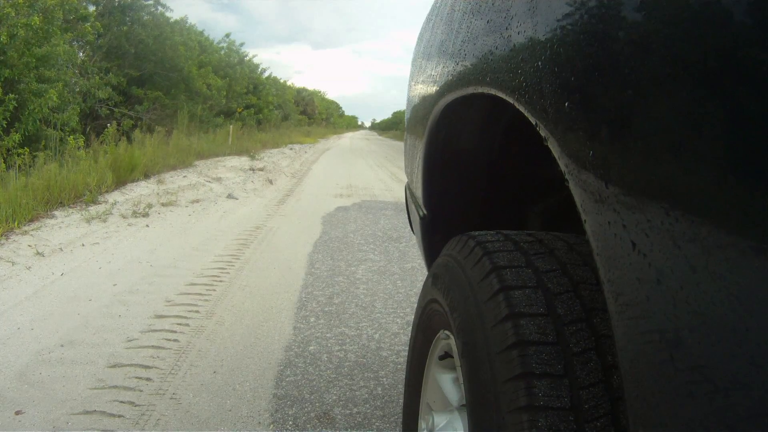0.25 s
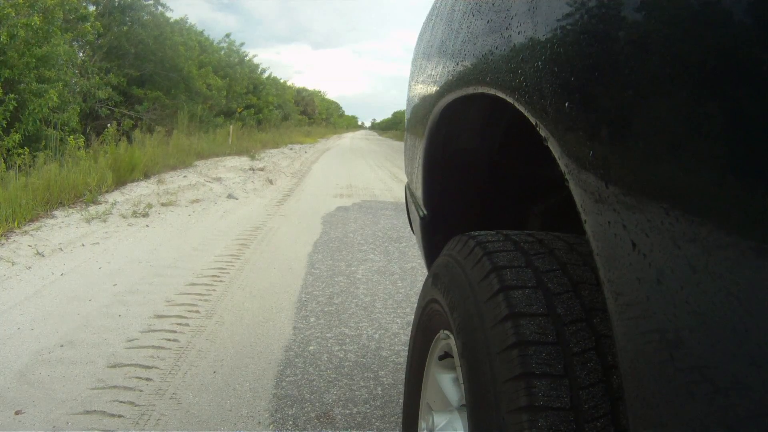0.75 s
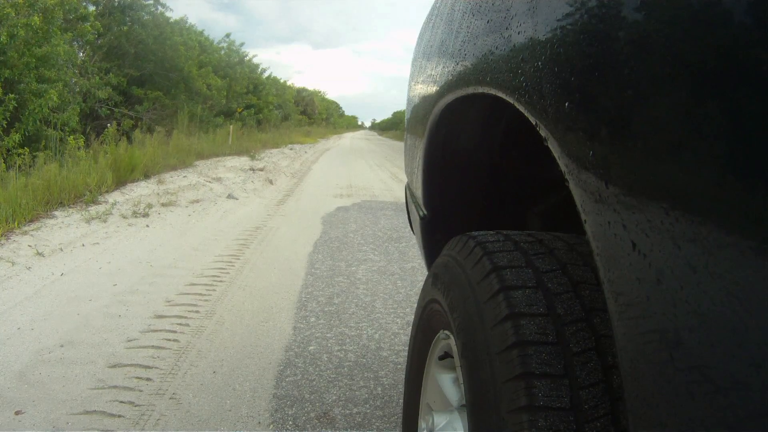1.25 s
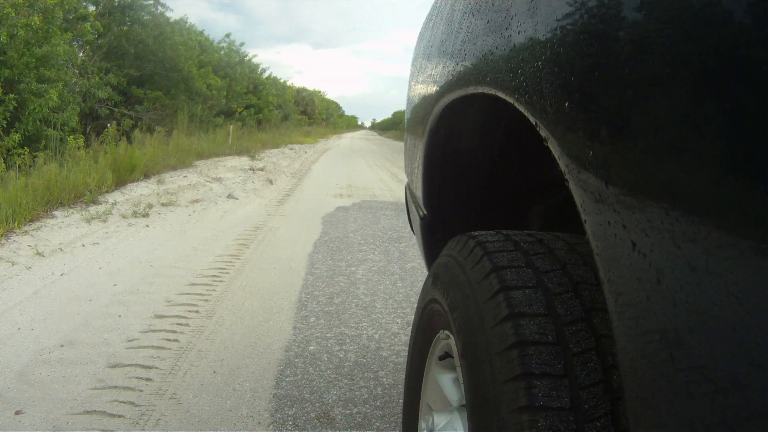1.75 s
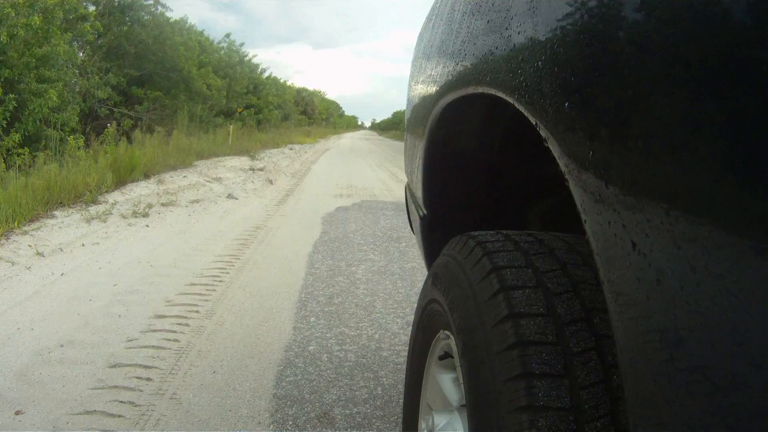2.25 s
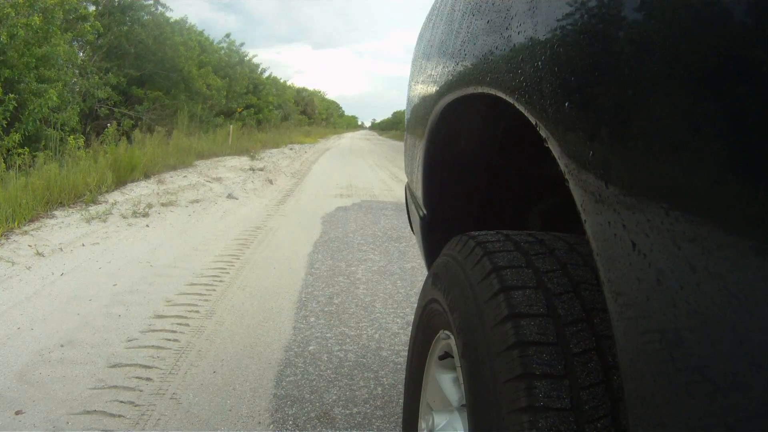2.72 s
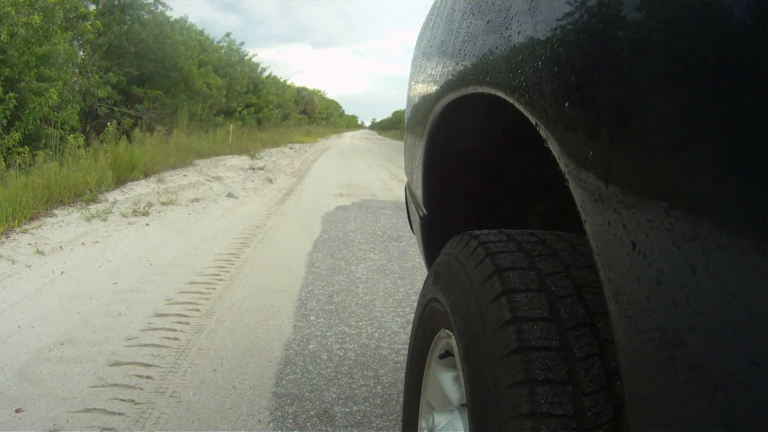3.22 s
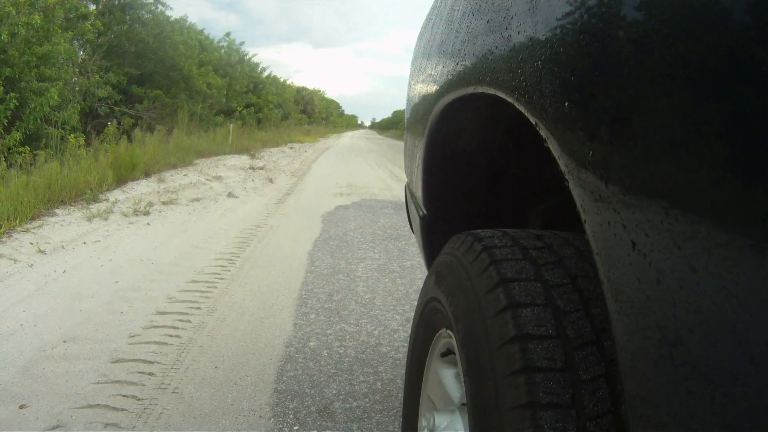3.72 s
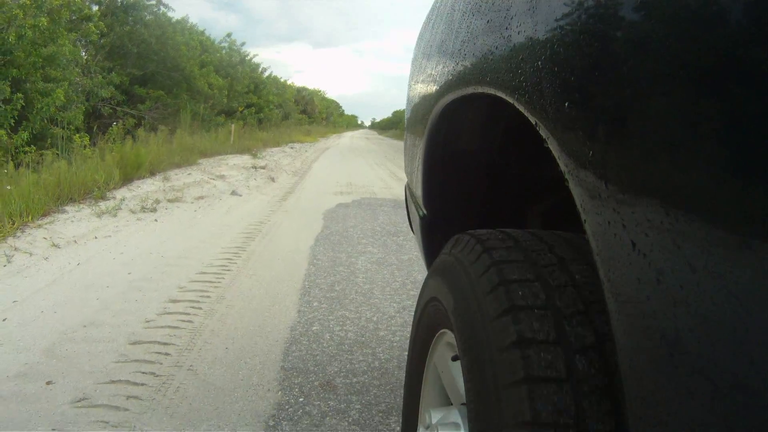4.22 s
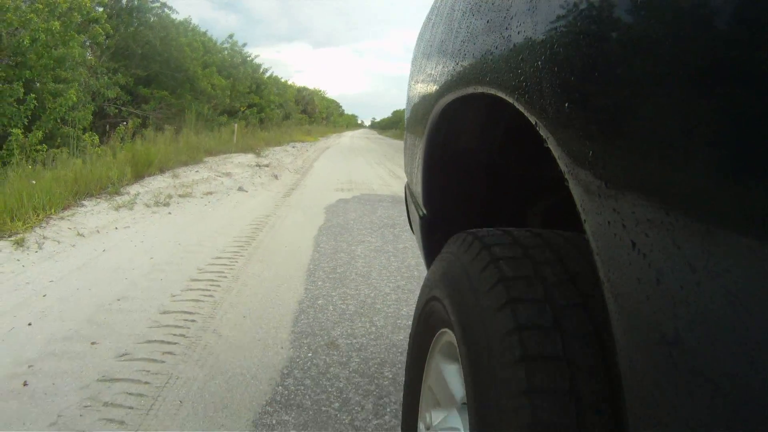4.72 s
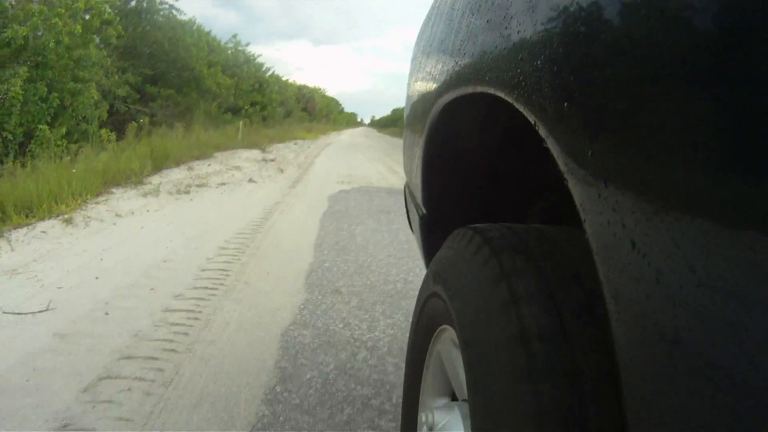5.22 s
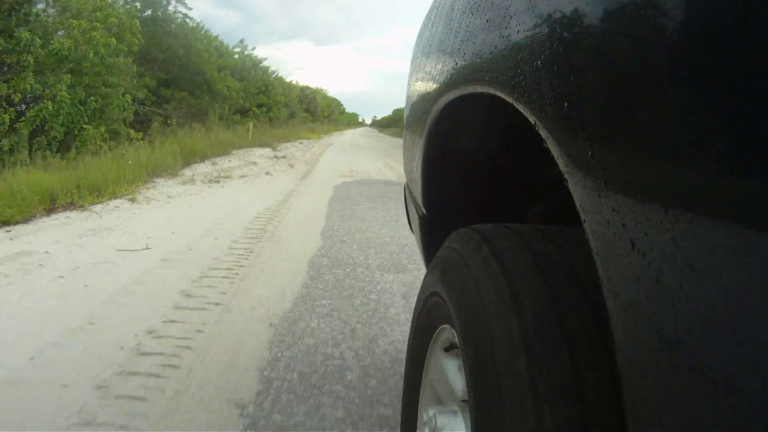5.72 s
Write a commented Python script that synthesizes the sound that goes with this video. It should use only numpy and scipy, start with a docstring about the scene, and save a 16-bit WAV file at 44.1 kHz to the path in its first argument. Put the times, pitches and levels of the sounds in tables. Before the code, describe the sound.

A six-cylinder diesel pickup with an open exhaust, heard close beside its front wheel outdoors. It idles low and lumpy with knock and hiss, shudders with small metal rattles as the drive engages, rolls away in a deeper rumble, then accelerates hard: a big low boom, louder clatter, a brief dip in the clatter and a rising roar.

```python
"""Behind the front wheel of a six-cylinder diesel pickup with an open exhaust, at a camera on its side.
It idles with a lope, shudders as the drive takes up, rolls off and revs hard; the clatter drops away
briefly while the pipe booms on. Exhaust orders (cosines locked to the engine cycle) fill the bass; noise
bursts at each firing, coloured by resonances of the panels and the camera's case, make knock and hiss."""
import sys
import numpy as np
from scipy import signal
from scipy.fft import rfft, irfft, next_fast_len
from scipy.io import wavfile

SR = 44100
rng = np.random.default_rng(int(sys.argv[2]) if len(sys.argv) > 2 else 0)


def master_out(mix):
    """Clip the mix to full scale and print it as 16-bit PCM to the path in sys.argv[1]."""
    frames = np.transpose(np.atleast_2d(mix))
    ceiling = np.clip(frames, -1, 1)
    pcm = np.round(ceiling * 32767).astype(np.int16)
    wavfile.write(sys.argv[1], SR, pcm)


N = 262836
TIME = np.arange(N) / SR

# Throttle. Each row: time in seconds, state (0 idling, 1 rolling, 2 full throttle, more for a hard stab).
DRIVE = [(0, 0.057), (2.7, 0.15), (3.3, 1.2), (4.68, 1.35), (4.87, 2.54), (5.04, 1.88), (5.14, 0.92),
         (5.28, 1.79), (5.5, 2.1), (5.96, 1.88)]
# Colour of loose metal. Each row: frequency in Hz, relative density in dB per Hz.
RATTLE_COLOUR = [(1800, -0.5), (3100, 12.5), (3700, 4.5), (4300, -6), (5000, 1.5), (6000, -10.5),
                 (7000, -3.5), (9000, -2.5), (10500, -14)]


def from_db(db):
    """Decibels to gain."""
    return 10 ** (np.asarray(db) / 20)


def rms_one(x):
    """Scale to unit power."""
    return x / np.sqrt(np.mean(x ** 2) + 1e-20)


def in_time(rows):
    """Each column of a curve at every sample."""
    s, *columns = np.transpose(rows)
    return [np.interp(TIME, s, c) for c in columns]


def drift(rate_hz):
    """Slow random wander of spread 1: noise low-passed at rate_hz."""
    size = 2048
    hz = np.arange(size // 2 + 1) * SR / N
    spectrum = rfft(rng.standard_normal(size)) / (1 + (hz / rate_hz) ** 4)
    slow = rms_one(irfft(spectrum, size))
    return np.interp(np.arange(N) * size / N, np.arange(size), slow)


def colour(x, spectrum):
    """Filter by a broad colour and the narrow body resonances; unit power."""
    # Panels and camera case. Each row: frequency in Hz, width in Hz, lift over the broad colour in dB.
    body = [(545, 30, 5), (668, 40, 7), (756, 25, 5), (820, 35, 4), (953, 35, 6), (1028, 20, 5),
            (1092, 30, 16), (1170, 36, 10), (1440, 50, 4), (1720, 50, 4), (2250, 30, 7), (2410, 40, 5),
            (3600, 110, 5), (4950, 40, 7), (7060, 40, 7), (8400, 140, 5), (9570, 260, 11), (9765, 35, 11),
            (10825, 60, 10), (10915, 55, 18), (11040, 70, 5), (11330, 60, 10), (12665, 60, 11),
            (13090, 55, 18), (13180, 80, 10), (14235, 60, 7), (14410, 240, 11)]
    size = next_fast_len(N, real=True)
    hz = np.maximum(np.arange(size // 2 + 1) * SR / size, 1)
    at_hz, level_db = np.transpose(spectrum)
    db = np.interp(np.log(hz), np.log(at_hz), level_db)
    octaves_above = np.maximum(np.log2(hz / at_hz[-1]), 0)
    octaves_below = np.maximum(np.log2(at_hz[0] / hz), 0)
    db = db - 24 * (octaves_above + octaves_below)
    for centre_hz, width_hz, lift_db in body:
        db = db + lift_db / (1 + (2 * (hz - centre_hz) / width_hz) ** 2)
    return rms_one(irfft(rfft(x, size) * from_db(db), size)[:N])


def ring(events, hz, t60_s):
    """Each event (seconds, dB) excites a two-pole resonator: a dying sine."""
    clicks = np.zeros(N) + 1e-18
    for s, db in events:
        clicks[round(s * SR)] += from_db(db)
    r = from_db(-60 / (t60_s * SR))
    w = 2 * np.pi * hz / SR
    return signal.lfilter([0, np.sin(w)], [1, -2 * r * np.cos(w), r * r], clicks)


def bursts(cycle, depth, length, lope_db, lope_at, scatter_db):
    """A soft noise puff per firing, over a steady part; one side of the cycle is louder.

    length is in firing intervals, lope_at in cycles.
    """
    firing = 6 * cycle + 6  # kept positive
    strength = from_db(scatter_db * rng.uniform(-1, 1, 1000))[firing.astype(int)]
    age = firing % 1
    burst = rms_one(strength * np.sin(np.pi * age) * np.exp(-age / length))
    share = np.clip(depth, 0, 1)
    lope = from_db(lope_db * np.cos(2 * np.pi * (cycle - lope_at)))
    return rng.standard_normal(N) * (1 - share + share * burst) * lope


def standing_lift_db(hz):
    """Lift by the pipe's standing waves of an order gliding through them."""
    # Each row: frequency in Hz, width in Hz, lift in dB.
    waves = [(59.92, 4.1, 18.5), (74.85, 4.3, 17), (106.6, 14, 7.5)]
    return sum(lift / (1 + (2 * (hz - centre) / width) ** 2) for centre, width, lift in waves)


def shake():
    """How hard the chassis shakes as the drive takes up, 0-1: a rise and a slightly slower fall."""
    start_s, peak_s, end_s = 2.78, 3.04, 3.38
    return np.interp(TIME, [start_s, peak_s, end_s], [0, 1, 0])


def boom(cycle, waver_db):
    """Firing note (order 6) and strong clean orders; close orders beat once a cycle: the lope."""
    # Firing note. Each row: time in seconds, relative rms level in dB.
    firing_note = [(0, -53), (2.2, -48), (2.75, -27), (4.15, -29), (4.7, -16.5), (4.87, -32), (5.0, -7.5),
                   (5.12, -9), (5.23, -15), (5.35, -11.5), (5.96, -17.5)]
    # Multiples of the two-turn engine cycle.
    boom_orders = (2, 3, 5, 9, 10, 12)
    # One row per order: relative level in dB idling, rolling, at full throttle.
    boom_levels = [(-65, -58, -26), (-34.5, -51, -40), (-60, -50, -35), (-41.5, -48.5, -32),
                   (-41.5, -39.5, -49), (-55, -55.5, -23)]
    shake_labour_db = 12  # swell of these orders at the height of the shake
    drive, = in_time(DRIVE)
    note_db, = in_time(firing_note)
    cycle_hz = np.gradient(cycle) * SR
    out = from_db(note_db + waver_db * drift(5.3)) * np.cos(2 * np.pi * 6 * cycle)
    for order, levels in zip(boom_orders, boom_levels):
        db = np.interp(drive, np.arange(3), levels) + standing_lift_db(order * cycle_hz)
        db = db + shake_labour_db * shake() + waver_db * drift(16.0)
        out = out + from_db(db) * np.cos(2 * np.pi * order * cycle)
    return np.sqrt(2) * out


def pipe(cycle, waver_db, jitter, lag, smear):
    """Unequal cylinders give weaker orders, set by the throttle; the pipe delays and smears each puff.

    jitter, lag and smear are in cycles.
    """
    # Multiples of the two-turn engine cycle.
    pipe_orders = (4, 7, 8, 11, 15, 16, 17, 18, 21, 24, 27, 30, 33, 36, 39, 42, 45, 48)
    # One row per order: relative level in dB idling, rolling, at full throttle.
    pipe_levels = [(-47, -39, -28), (-39.5, -48, -35), (-71, -61, -53), (-59, -49, -42), (-48, -43.5, -41),
                   (-51.5, -47, -38), (-73, -59, -40), (-44.5, -44, -28.5), (-43, -39, -40.5),
                   (-50.5, -49, -33), (-58, -62, -37.5), (-57, -58, -35.5), (-54, -50, -57),
                   (-66, -48, -57), (-62, -72, -56), (-82, -54.5, -44), (-55, -71, -61), (-74, -50, -51)]
    drive, = in_time(DRIVE)
    cycle_hz = np.gradient(cycle) * SR
    uneven = cycle - lag + jitter * drift(5.3)
    out = 0
    for order, levels in zip(pipe_orders, pipe_levels):
        db = np.interp(drive, np.arange(3), levels) + standing_lift_db(order * cycle_hz)
        db = db + waver_db * drift(5.3)
        out = out + from_db(db) * np.cos(2 * np.pi * (order * uneven - smear * order ** 2))
    return np.sqrt(2) * out


def turbulence(cycle, flow_db):
    """Exhaust gas roar: low noise puffed by each firing."""
    # Each row: frequency in Hz, relative density in dB per Hz.
    roar_colour = [(15, -20), (25, -7), (60, 20.5), (115, -1.5), (170, 6.5), (230, -1), (310, 0.5),
                   (420, -10), (700, -22)]
    puffs = bursts(cycle, depth=0.11, length=0.25, lope_db=0.5, lope_at=.1, scatter_db=4)
    return from_db(flow_db + 5.5) * colour(puffs, roar_colour)


def combustion(cycle):
    """Diesel knock: dull thud, panel chuff, ringing knock and the injectors' bright clatter."""
    # Each row of the three colours: frequency in Hz, relative density in dB per Hz.
    thud_colour = [(250, -38), (420, -15.5), (520, -2.5), (620, -2), (800, -2), (900, -48), (1400, -66)]
    knock_colour = [(600, -58), (850, -3), (1000, 1.5), (1220, 2), (1330, -8.5), (1750, -8.5), (2050, -23),
                    (2800, -46), (5000, -53)]
    clatter_colour = [(1200, -23), (2000, -5), (2230, -1), (2480, 3.5), (2660, -4.5), (2800, -19),
                      (3600, -18), (5000, -35)]
    drive, = in_time(DRIVE)
    thud = bursts(cycle, depth=0.082, length=1.0, lope_db=0.0, lope_at=0.89, scatter_db=9)
    thud = colour(thud, thud_colour)
    chuff = panel(cycle, hz=661.3, t60_s=.19, scatter_db=1.0)
    knock = bursts(cycle, depth=0.11 + 0.03 * drive, length=0.83, lope_db=0.5, lope_at=0.64, scatter_db=1.0)
    knock = colour(knock, knock_colour)
    clatter = bursts(cycle, depth=0.14, length=0.63, lope_db=1.36, lope_at=0.39, scatter_db=9.5)
    clatter = colour(clatter, clatter_colour)
    # chuff and clatter grow less with throttle than the knock
    out = from_db(-7.5) * thud + from_db(-8.0 - 1.25 * drive) * chuff
    return out + from_db(-2.5 + 0.76 * drive) * knock + from_db(-8.5 - 2.2 * drive) * clatter


def panel(cycle, hz, t60_s, scatter_db):
    """The hardest cylinder sets a panel ringing once a cycle: a soft, regular chuff; unit power."""
    # Point in the cycle, in cycles, where that cylinder fires: idling, rolling, full throttle.
    hard_knock_at = (.62, 1.15, 0.55)
    drive, = in_time(DRIVE)
    turns = np.floor(cycle - np.interp(drive, np.arange(3), hard_knock_at))
    times_s = TIME[1:][np.diff(turns) > 0]
    levels_db = scatter_db * rng.standard_normal(len(times_s))
    rung = ring(zip(times_s, levels_db), hz, t60_s)
    # the ringing takes a moment to spread through the sheet
    spread = signal.butter(1, [hz - 14, hz + 14], "band", fs=SR, output="sos")
    return rms_one(signal.sosfilt(spread, rung))


def air_hiss(cycle, knock_db):
    """Bright air noise puffed by each firing, following most of the knock's swing."""
    # Each row: frequency in Hz, relative density in dB per Hz.
    hiss_colour = [(1500, 5), (3100, 0.5), (3400, -1), (4200, 3), (5050, 5), (6000, -12), (6950, 3.5),
                   (7900, -6), (8600, 1), (10400, 6.5), (11300, 4.5), (12000, -6), (13200, 6), (15000, 1)]
    level_db = -19 + 0.84 * knock_db
    puffs = bursts(cycle, depth=0.2, length=0.81, lope_db=0.56, lope_at=0.11, scatter_db=9)
    return from_db(level_db) * colour(puffs, hiss_colour)


def shudder():
    """Driveline jolts ring the chassis at 41 Hz; a high-pass clears the lowest bass."""
    # Each row: time in seconds, strength in dB.
    jolts = [(2.835, -8), (2.88, -6.5), (2.929, -7.5), (2.982, -1.5), (3.028, -6), (3.115, -16),
             (3.197, -12)]
    high_pass = signal.butter(2, 17, "high", fs=SR, output="sos")
    return signal.sosfilt(high_pass, ring(jolts, hz=41.3, t60_s=0.13))


def buzz(cycle, flow_db):
    """Loose metal buzzes with each firing as the pipe blows harder."""
    level_db = -9.5 + 1.033 * flow_db
    puffs = bursts(cycle, depth=0.31, length=0.079, lope_db=-1.0, lope_at=0.24, scatter_db=13)
    return from_db(level_db) * colour(puffs, RATTLE_COLOUR)


def rattle(decay_s):
    """Touches of loose metal are brief bright cracks; light ones fall at random during the shake."""
    # Loudest touches. Each row: time in seconds, relative envelope peak in dB.
    ticks = [(1.4501, -28), (2.9025, -26), (2.984, -30), (3.0076, -26), (3.034, -30), (3.0654, -30),
             (3.0829, -26), (3.1313, -29), (5.023, -25), (5.0404, -25)]
    small_per_s, small_db, small_scatter_db = 40, -36, 2  # rate at the height of the shake
    touches = rng.random(N) < small_per_s * shake() / SR
    envelope = touches * from_db(small_db + small_scatter_db * rng.standard_normal(N))
    for s, db in ticks:
        envelope[round(s * SR)] += from_db(db)
    envelope = signal.lfilter([1], [1, -np.exp(-1 / (decay_s * SR))], envelope + 1e-18)
    return envelope * colour(rng.standard_normal(N), RATTLE_COLOUR)


def side_noise():
    """Faint steady noise of opposite sign in the two ears."""
    tilt = [(40, 22), (300, 7.0), (3000, -12.5), (8000, -10)]  # Hz, dB per Hz
    return from_db(-79.5) * colour(rng.standard_normal(N), tilt) * np.array([[1], [-1]])


def scene():
    """Engine, exhaust and chassis, nearly the same in both ears."""
    # Engine speed. Each row: time in seconds, firings per second.
    speed = [(0, 38.98), (3.0, 38.7), (3.3, 40.9), (3.55, 37.1), (4.05, 37.2), (4.77, 41.0), (4.86, 52.0),
             (5.0, 60.5), (5.1, 61.5), (5.2, 66.3), (5.6, 71.4), (5.96, 72.6)]
    # Exhaust turbulence. Each row: time in seconds, relative level in dB.
    flow_curve = [(0, -42), (2.7, -42), (3.05, -35), (3.35, -42.5), (3.58, -38.5), (3.8, -42.5), (4.5, -39),
                  (4.8, -31), (4.95, -25), (5.12, -34), (5.3, -34), (5.58, -23.5), (5.78, -29), (5.96, -28)]
    # Engine load. Each row: time in seconds, relative knock level in dB.
    load = [(0, -33), (2.8, -33), (3.1, -29.5), (4.4, -28.5), (4.8, -24.5), (4.965, -14), (5.1, -32),
            (5.17, -34.5), (5.215, -27), (5.38, -21), (5.45, -25.5), (5.53, -17), (5.82, -21.5),
            (5.88, -16.5), (5.96, -19.5)]
    firing_hz, = in_time(speed)
    cycle = np.cumsum(firing_hz) / SR / 6 - .22
    flow_db, = in_time(flow_curve)
    knock_db, = in_time(load)
    exhaust = from_db(-0.8) * boom(cycle, waver_db=1.84)
    exhaust = exhaust + from_db(-1.33) * pipe(cycle, waver_db=2.96, jitter=0.0014, lag=0.0033, smear=.0105)
    flow = turbulence(cycle, flow_db)
    knock = from_db(knock_db) * combustion(cycle)
    hiss = air_hiss(cycle, knock_db)
    metal = buzz(cycle, flow_db) + from_db(-6.0) * rattle(decay_s=0.0024)
    return exhaust + flow + knock + hiss + shudder() + metal + side_noise()


def record(dry):
    """A faint thin whine, the sound multiplied by a 12 kHz tone; rounded peaks and a steep top cut."""
    whine_hz, cutoff_hz = 12000, 15100
    whine = from_db(-38) * dry * np.cos(2 * np.pi * whine_hz * TIME)
    rounded = 1.779 * np.tanh((dry + whine) / 1.82)
    top_cut = signal.ellip(10, .1, 90, cutoff_hz, fs=SR, output="sos")
    return signal.sosfilt(top_cut, rounded)


dry = scene()
out = record(dry)
master_out(out)
```